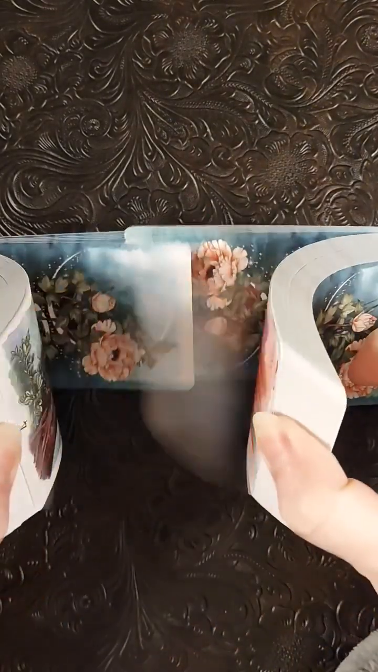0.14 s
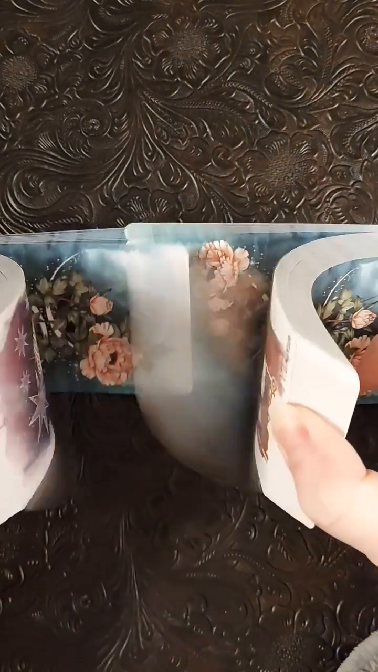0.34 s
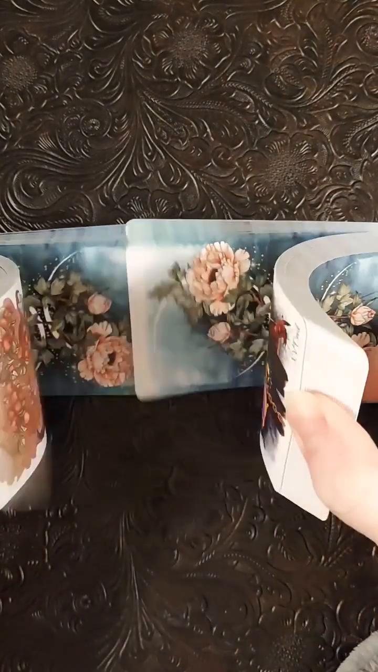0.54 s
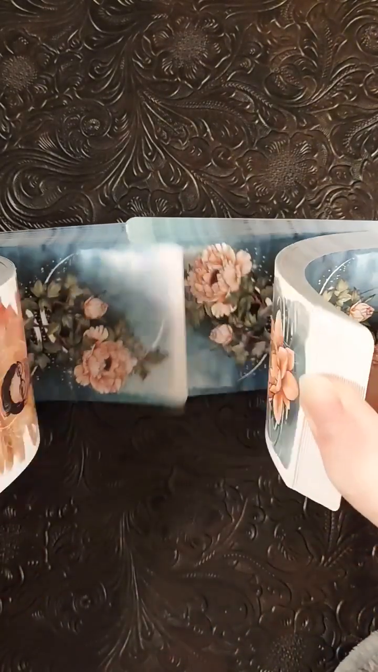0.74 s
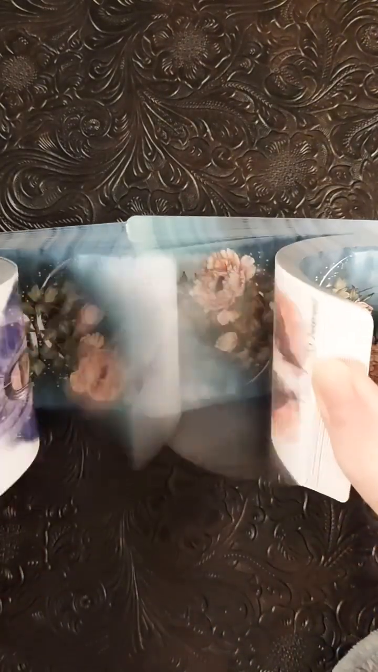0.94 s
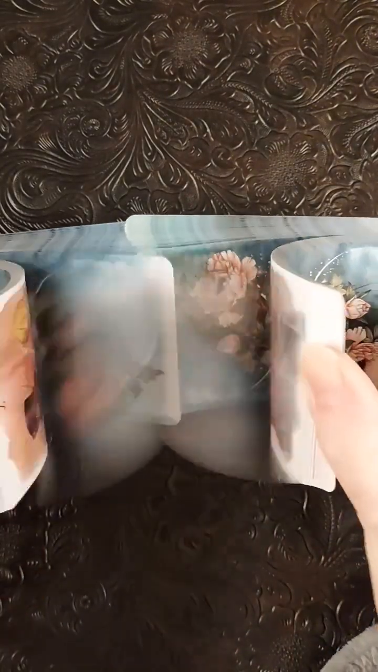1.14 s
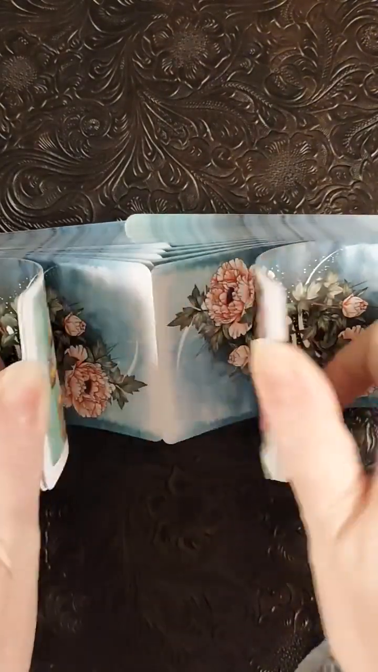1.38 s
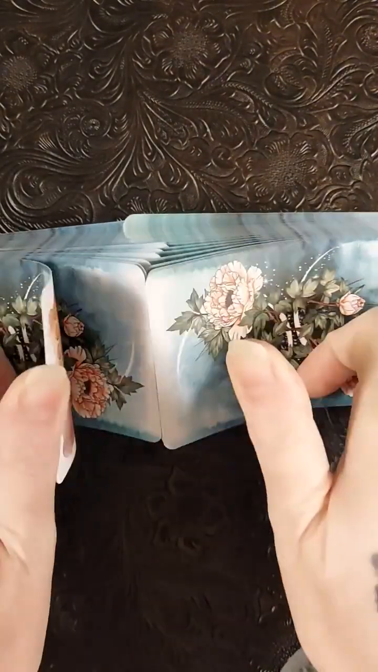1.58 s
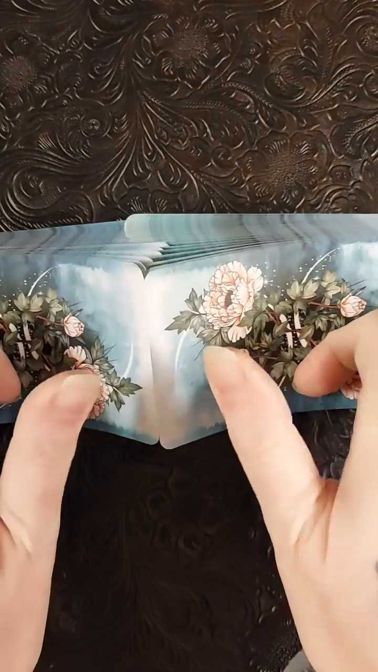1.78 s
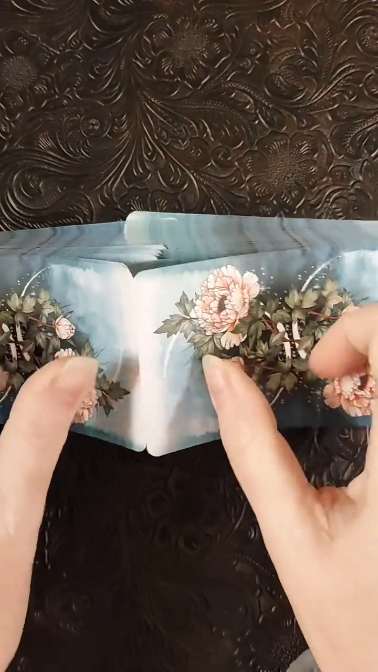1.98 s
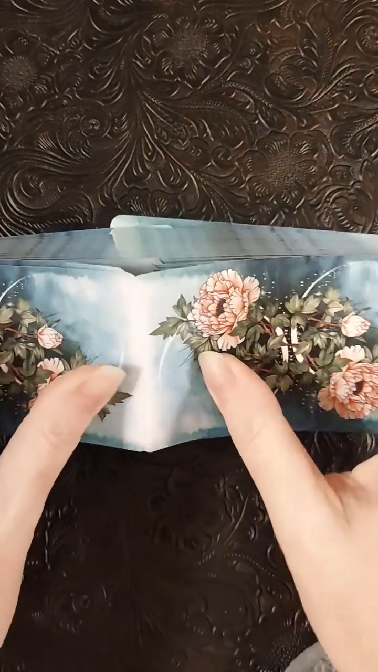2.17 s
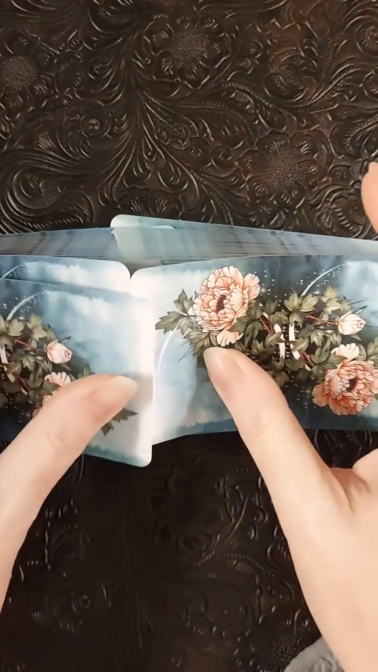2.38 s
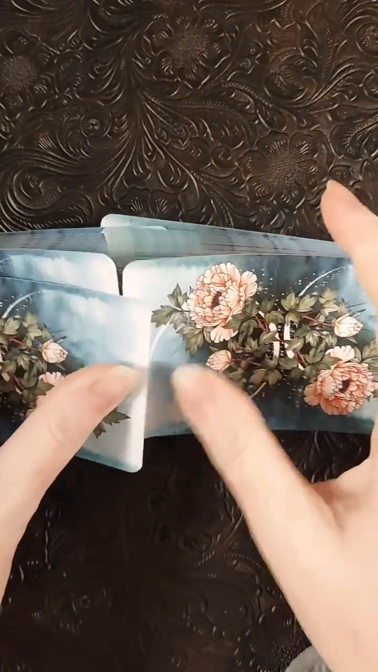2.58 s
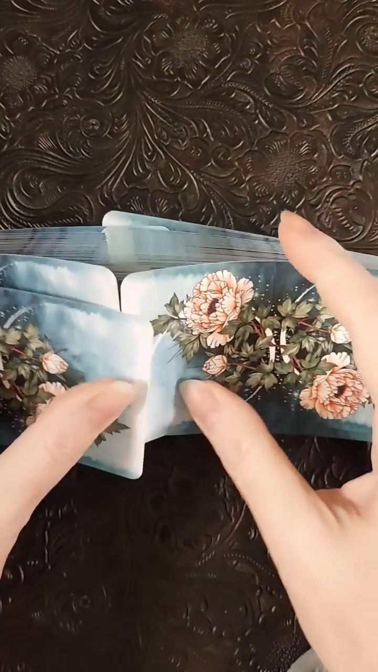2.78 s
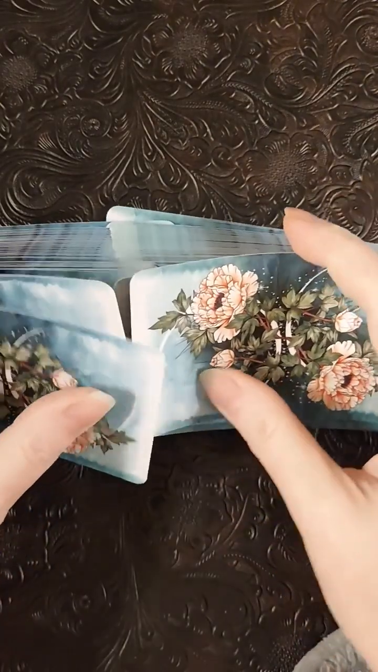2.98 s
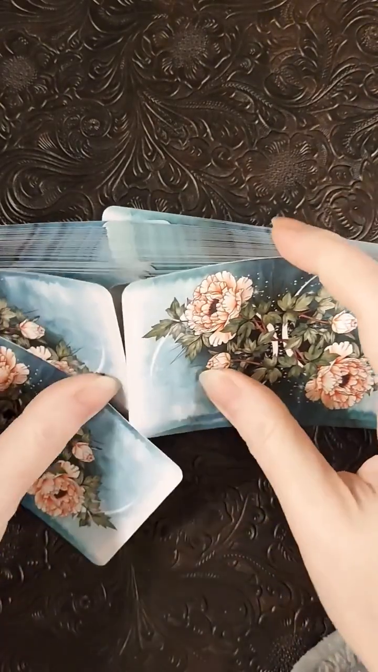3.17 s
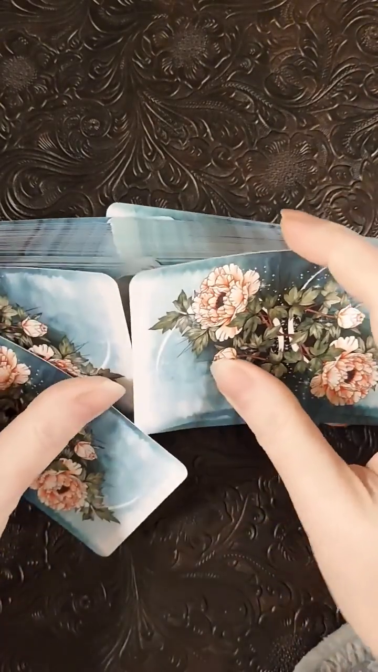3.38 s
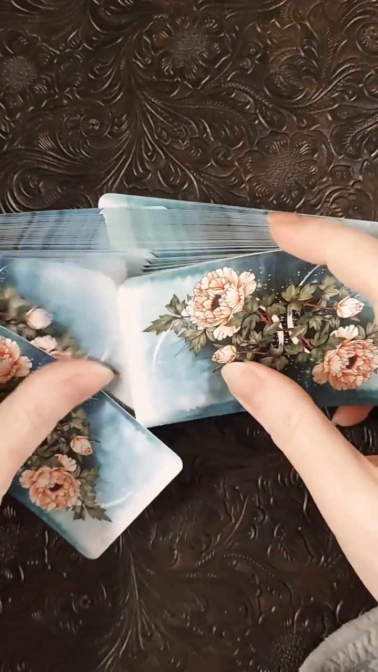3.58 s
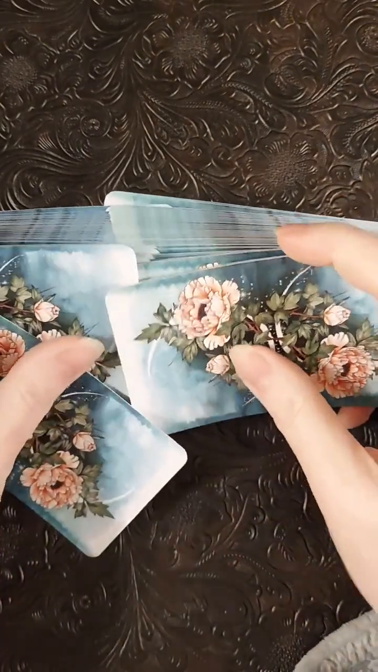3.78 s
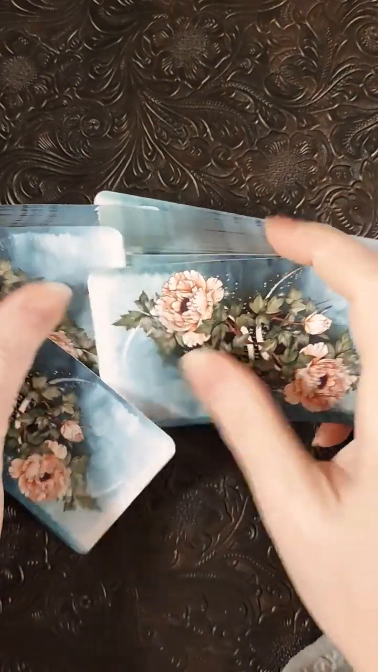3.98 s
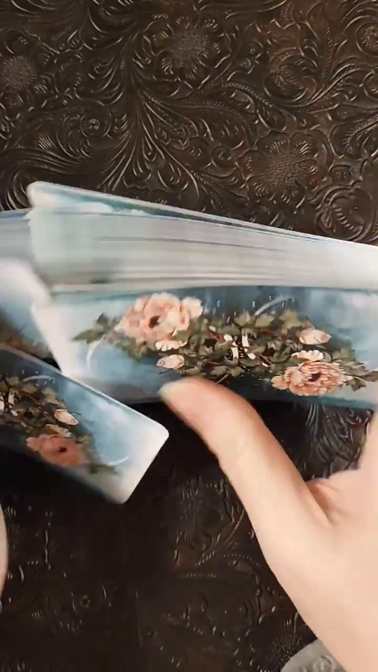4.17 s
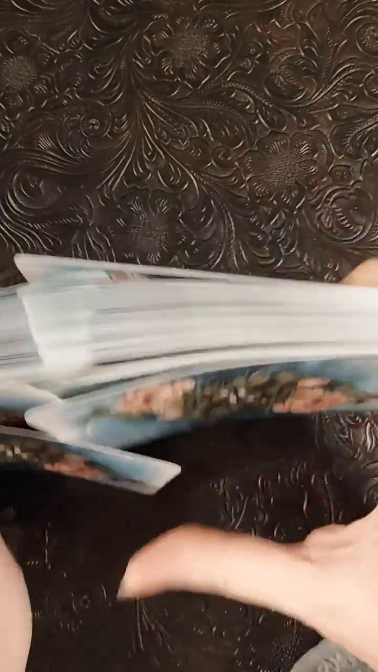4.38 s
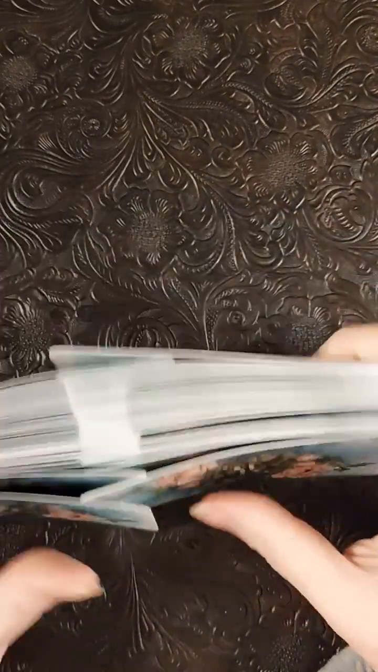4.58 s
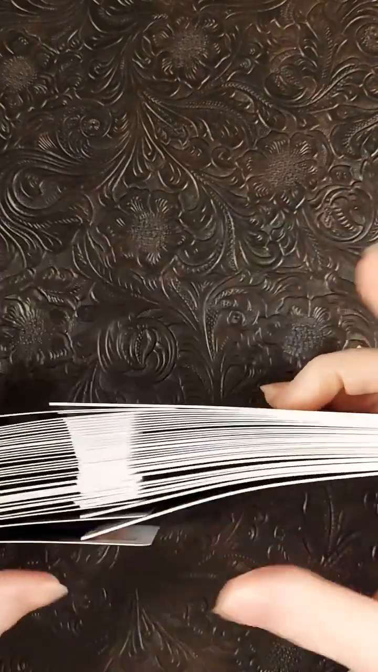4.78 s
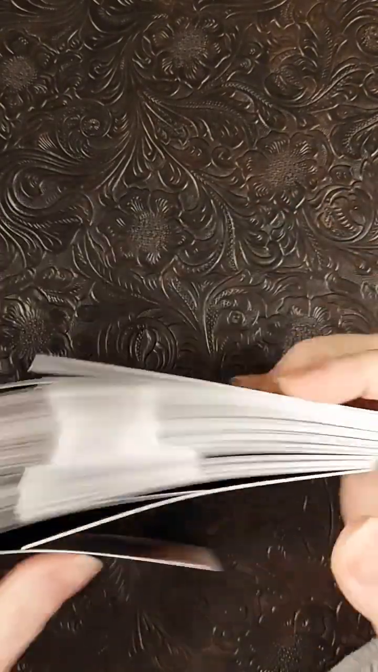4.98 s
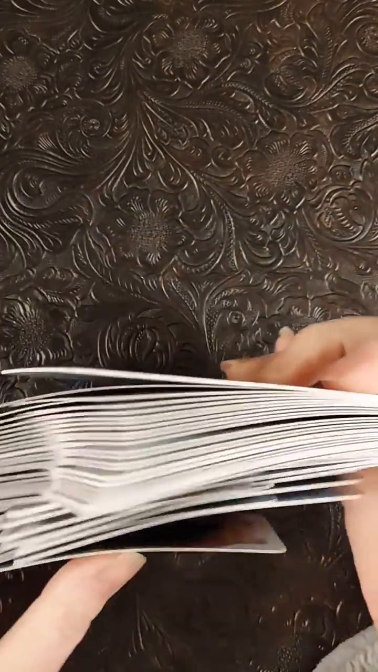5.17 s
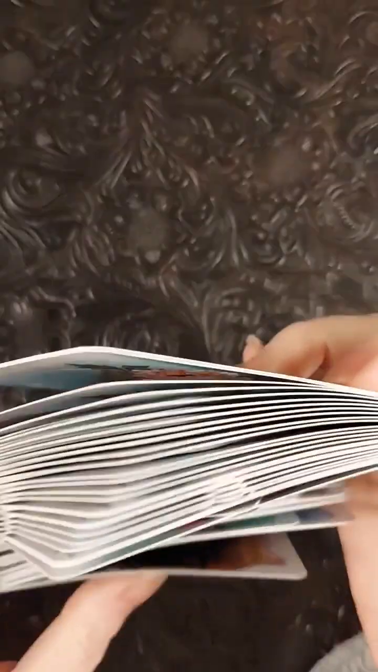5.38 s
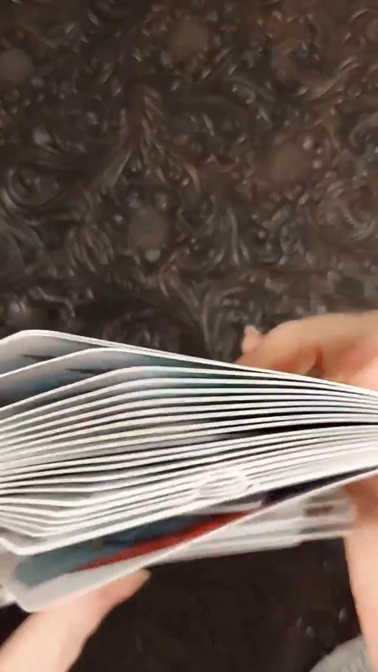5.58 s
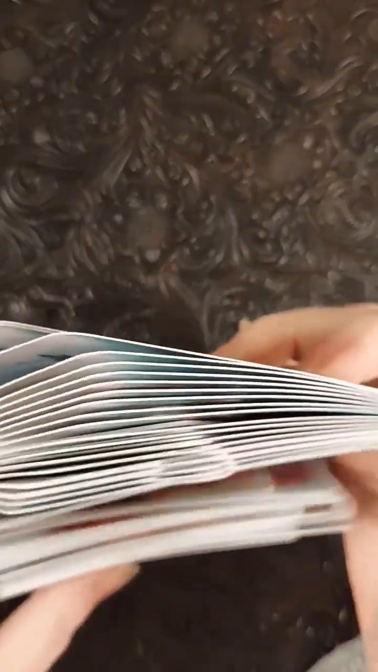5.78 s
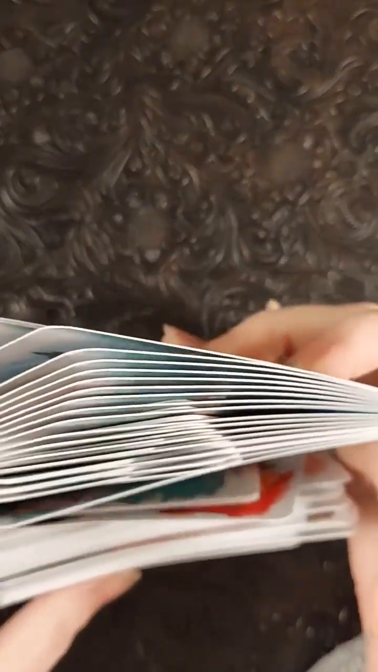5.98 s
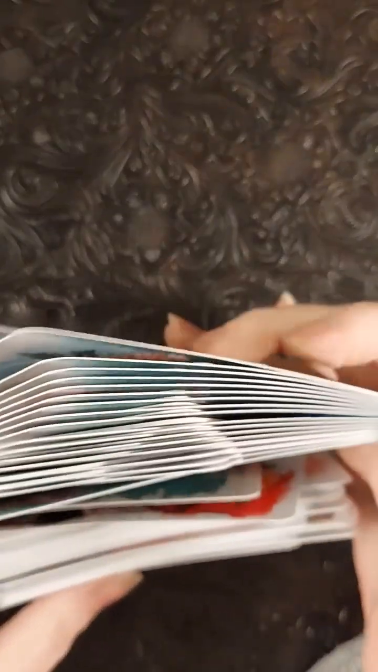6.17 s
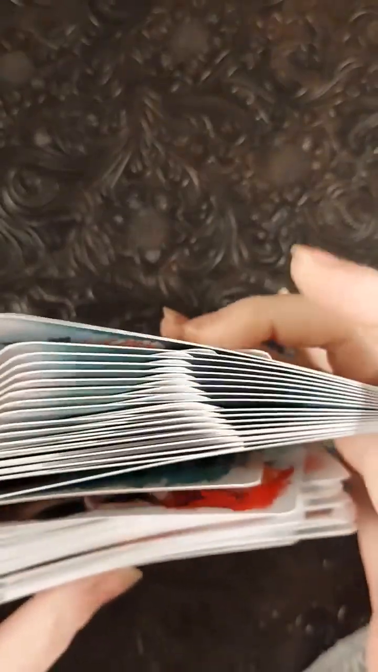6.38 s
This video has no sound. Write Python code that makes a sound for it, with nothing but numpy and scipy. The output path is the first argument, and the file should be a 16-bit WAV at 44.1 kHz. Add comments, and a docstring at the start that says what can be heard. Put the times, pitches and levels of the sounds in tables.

```python
"""Stiff cards snap and slap in a quick riffle at first, over rustling, a low machine hum and faint room noise.
The pack is then nudged, lifted and knocked square on a desk.
Each card blow is spiky noise for the edge, ringing noise for the pile and a soft puff of air.
Sliding faces are bands of grainy noise; knocks push the resonances of the desk.
Pressing hands are low noise, the hum is two sine tones, and a short echo follows the blows."""
import sys
import numpy as np
from scipy import signal
from scipy.fft import rfft, irfft, next_fast_len
from scipy.io import wavfile
from scipy.ndimage import uniform_filter1d, map_coordinates

SR = 44100
rng = np.random.default_rng(int(sys.argv[2]) if len(sys.argv) > 2 else 0)


def transcribe(signal):
    """Save signal, clipped to [-1, 1], as a 16-bit WAV file at the path in sys.argv[1]."""
    frames = np.atleast_2d(signal).T
    limited = np.clip(frames, -1, 1)
    pcm = np.round(limited * 32767).astype(np.int16)
    wavfile.write(sys.argv[1], SR, pcm)


N = 284004

# Blows and thuds get further gains; rubbing, rumble and hum use their table levels; the microphone colours all.

# Cards slapping the pile: (time [s], snap level [dB], pile ring level [dB], snap time to fall 60 dB [s],
# ring centre [Hz], treble tilt [dB], left over right [dB])
SLAPS = [(0.0327, -40.5, -47.5, 0.041, 1730.0, 3, -11), (0.0445, -20.5, -44.5, 0.097, 2045, -8.5, -2),
         (0.076, -37.5, -38, 0.033, 1630, 0.5, -3), (0.0985, -1.5, -38.5, 0.026, 2680.0, -7, 2),
         (0.1156, -24.5, -40.5, 0.041, 2050.0, -2.5, -3), (0.1503, -13.5, -31.5, 0.03, 1680.0, -6.5, -2.5),
         (0.176, -16.5, -40, 0.021, 1873, -1.5, -3.5), (0.2062, -3.5, -34.5, 0.032, 1854, -1.5, -2),
         (0.2485, -17.5, -46, 0.045, 1080.0, -6, 0), (0.271, -18.5, -37, 0.04, 1960, 2.5, 1),
         (0.3248, -23.5, -40.5, 0.052, 2220.0, -8, -1.5), (0.3426, -20.5, -36, 0.041, 2770, -2.5, -2.5),
         (0.3607, -30, -47, 0.033, 1760.0, 2, -6), (0.381, -16.5, -57, 0.088, 1600.0, -2, 1),
         (0.4074, -19.5, -37, 0.05, 1490.0, 7.5, -4.5), (0.4255, -27, -46.5, 0.041, 2720.0, -14.5, 2),
         (0.441, -18, -34.5, 0.061, 1350, -3.5, 0.5), (0.463, -19.5, -38.5, 0.096, 2290.0, 0, -1),
         (0.511, -16.5, -44.5, 0.06, 2420.0, -2, -2.5), (0.5225, -22.5, -41, 0.081, 2110.0, -3, 0),
         (0.561, -21, -60, 0.031, 2530.0, -10, -3), (0.613, -16.5, -42, 0.057, 2150.0, -5, -1),
         (0.6542, -33.5, -45.5, 0.018, 1200, -6, -0.5), (0.663, -13, -25, 0.049, 1875, -2, 1.5),
         (0.7162, -14.5, -24.5, 0.085, 2290.0, 2, 1.5), (0.7338, -16, -33, 0.043, 2470, -1.5, -3.5),
         (0.74, -27, -43, 0.017, 2200, 0, 2.5), (0.755, -30, -42, 0.02, 2600, -0.5, -2),
         (0.7656, -11.5, -19, 0.082, 2227, -1.5, -2.5), (0.8014, -28.5, -41, 0.033, 1315, -4.5, -2.5),
         (0.829, -19, -37.5, 0.032, 1210.0, -0.5, -1), (0.8611, -13, -25, 0.043, 2002, -7.5, -3),
         (0.8935, -10, -32, 0.03, 2034, -13.5, -4.5), (0.909, -30.5, -39, 0.033, 1908, -3.5, -1),
         (0.927, -12.5, -18.5, 0.071, 1986, -5.5, -3.5), (0.9559, -9.5, -17, 0.066, 2800, -4.5, -1.5),
         (0.9709, -17.5, -23.5, 0.13, 2440, 3, -1.5), (0.9886, -15.5, -22.5, 0.059, 1880, -2, -1),
         (1.0003, -13, -29.5, 0.03, 2145, -7.5, 1), (1.029, -34.5, -41.5, 0.03, 1722, -3, -5),
         (1.035, -11, -15.5, 0.087, 2344, 0, 1), (1.047, -26.5, -26, 0.047, 1992, -6, 0.5),
         (1.0767, -29.5, -41, 0.043, 1309, 0, -1), (1.088, -32.5, -44.5, 0.023, 1535, -3.5, -1),
         (1.112, -12.5, -34, 0.031, 1860, -4, -0.5), (1.1429, -12.5, -18, 0.034, 2157, -5, -2),
         (1.1603, -10.5, -20.5, 0.039, 2213, -4, -1.5), (1.183, -31, -36.5, 0.034, 2660.0, -10.5, -3.5),
         (1.1943, -22.5, -31, 0.081, 1823, 3.5, -4.5), (1.205, -18, -28.5, 0.03, 1807, 0.0, 0),
         (1.2393, -5, -20, 0.065, 1816, -3, 1), (1.2466, -20, -31, 0.014, 1938, -5.5, -2),
         (1.2878, -6, -14.5, 0.041, 2384, -14, 2.5), (1.2948, -8.5, -32, 0.063, 2646, 13, 0),
         (1.303, -15.5, -22, 0.095, 3040.0, 0, -4.5), (1.324, -7, -31, 0.046, 1890.0, 2, 0),
         (1.342, -18, -23, 0.036, 1822, -8, 2), (1.368, -6, -30, 0.023, 1663, -3, -2.5),
         (1.4225, -9, -22, 0.024, 2093, -6.5, 0), (1.4267, -14, -26.5, 0.064, 2193, 3, -1.5),
         (1.4476, -12, -31.5, 0.059, 1253, -1.5, 1), (1.4897, -21, -29, 0.055, 1920, -2.5, 1.5),
         (1.5063, -29.5, -41.5, 0.027, 2107, 9.5, 1), (1.5201, -22.5, -29, 0.047, 1723, -0.5, -4),
         (1.5509, -31.5, -51, 0.03, 2176, 2, -3.5), (1.5635, -19, -35, 0.043, 1768, -5, 1),
         (1.5837, -22.5, -28.5, 0.091, 1405, -3.5, 0.5), (1.644, -24, -41.5, 0.034, 1933, -5, -3),
         (1.705, -31, -45, 0.12, 2870.0, 3.5, 0), (1.718, -20.5, -38, 0.023, 2070, -5, 3)]
# Air under a slap as the pile grows: (time [s], level [dB])
PUFF = [(0, -29.5), (.3, -39.5), (1.1, -38.5), (1.35, -30.5), (1.75, -45.5)]
PUFF_GROWS = 0.34  # dB more air per dB of snap
# Ringing of the pile: (centre [Hz], width [Hz], level [dB])
PILE_MODES = [(720, 87, 4), (1147, 54, 2), (1540, 260, -1), (2080, 560, 1), (2360, 550, -3),
              (2970, 120, -0.5)]
# Colour of a snapping edge: (frequency [Hz], level [dB per Hz])
SNAP_COLOUR = [(880, -11), (1500, -11.5), (2140, -8.5), (2930, -12), (3560, -6), (5880, -5.5), (7590, -6),
               (13500, -5), (15700, -14.5)]
# Tone of the air puff from under a card: (centre [Hz], width [Hz], level [dB])
AIR_MODES = [(204, 260, 0)]
# How alike left and right are for card blows: (frequency [Hz], likeness [0 to 1])
CARD_ALIKE = [(200, 0.2), (1000, 1), (2500, 0.36), (4000, 0.46), (6000, .12), (14000, 0.47)]
# How early sound reaches the left channel: (time [s], lead [ms])
LEAD = [(0, .13), (3.7, 0.12), (4.3, 0.0033), (6.4, 0.011)]
FLICK_DB = 13  # one spike as the edge leaves, above the small contacts
DETUNE = 0.053  # pile modes shift by about this share from blow to blow
RING_RISE_S, STRIKE_T60_S = 0.001, 0.004  # the face lands gradually; the first contact is short
# Loss of a mode one octave from the ring's centre
SLAP_FOCUS_DB, TICK_FOCUS_DB, KNOCK_FOCUS_DB = 8.5, 14.5, 30

# Bent cards rustling between slaps: (time [s], hiss level [dB], scrape above hiss [dB])
RUSTLE = [(0, -56, 1.5), (.25, -50.5, -8), (.47, -58.5, -4), (.72, -63, 8), (.85, -51.5, 0.5),
          (1.15, -55, -1), (1.4, -45.5, -1.5), (1.66, -63, 0), (1.78, -71, 2), (1.82, -120, 0)]
# Faces sliding over each other: (time of peak [s], speeding up [s], slowing down [s], hiss level [dB],
# scrape above hiss [dB])
STROKES = [(1.849, 0.028, 0.17, -62, 7.5), (1.949, 0.13, 0.042, -52, -8), (2.12, 0.12, 0.16, -57, -2.5),
           (2.236, 0.097, 0.094, -56.5, 1), (2.54, 0.045, 0.1, -76.5, 10.5), (2.85, 0.079, 0.12, -77.5, 7),
           (3.01, 0.061, 0.11, -64, 7.5), (3.18, 0.27, 0.055, -58, -11), (3.279, 0.17, 0.11, -74.5, 11),
           (3.55, 0.061, 0.096, -73.5, 6.5), (3.7, 0.12, 0.13, -65, 4), (3.991, 0.24, 0.35, -67, -2),
           (4.315, 0.055, 0.08, -68.5, 3.5), (4.521, 0.15, 0.16, -50, -10.5), (4.621, 0.17, 0.11, -54.5, 5),
           (4.75, 0.17, 0.14, -65, -1.5), (5.051, 0.14, 0.14, -42, -11.5), (5.27, 0.33, 0.81, -52, -5.5),
           (5.419, 0.13, 0.028, -49, 4), (5.5, 0.15, 0.11, -96, -3), (5.598, 0.041, 0.1, -51, -15.5),
           (5.762, 0.15, 0.088, -44.5, -15), (5.848, 0.059, 0.054, -49, 1.5),
           (5.93, 0.052, 0.057, -47, -14), (6.038, 0.14, 0.04, -48.5, -14), (6.18, 0.14, 0.18, -73.5, -3.5),
           (6.41, 0.056, .1, -65.5, -4.5)]
EDGE_DB, SWELL = 32, 1.95  # fall from the peak to either end of a stroke; roundness of its top
# Colour of the hiss: (frequency [Hz], level [dB per Hz])
HISS_COLOUR = [(1760, -33), (3000, -3), (5290, 3.5), (5830, 2), (8600, 0.5), (9740, 1), (14600, -3),
               (15700, -1)]
# Colour of the scrape: (frequency [Hz], level [dB per Hz])
SCRAPE_COLOUR = [(350, -51.5), (600, -19), (792, -17.5), (1170, -8), (1400, -0.5), (1850, 4), (2900, -0.5),
                 (4000, -11), (5200, -42.5), (8800, -120)]
# How alike left and right are for rubbing: (frequency [Hz], likeness [0 to 1])
RUB_ALIKE = [(500, 0.27), (2500, .6), (5000, 0.16), (9000, 0.52), (14000, .15)]
# Change in the top of the hiss: (time [s], gain [dB])
SHEEN = [(0, 4.5), (1.7, -6.5), (2.3, -4), (3.2, 0.5), (4, -3), (4.5, -4.5), (4.9, 1), (5.1, 2.5),
         (5.3, -6.5), (5.6, 1), (5.76, 2), (5.93, 6), (6.04, 7.5), (6.44, -11)]
SHEEN_HZ = 8600  # the top of the hiss starts around here
# Change in the low band of the scrape: (time [s], gain [dB])
DRAG = [(0, 9.5), (1.8, -8.5), (2.1, -4), (3.2, -0.5), (3.5, 10), (3.9, 14), (4.35, 14), (4.5, 1.5),
        (5.1, -6), (5.8, 6), (6.44, 5.5)]
DRAG_HZ, DRAG_WIDTH_HZ = 1270, 780

# Hands pressing on the desk: (time [s], rumble level [dB])
HANDS = [(0, -49.5), (.4, -53), (1.2, -44), (1.55, -65.5), (1.75, -73.5), (4.1, -62), (4.4, -64), (6, -62),
         (6.44, -68.5)]
# Colour of the hand rumble: (frequency [Hz], level [dB per Hz])
RUMBLE_COLOUR = [(30, -4), (70, -4.5), (130, 0.5), (300, -6), (600, -18.5), (1200, -43.5)]
# Machine hum: (time [s], level [dB])
HUM = [(0, -55.5), (1.6, -55.5), (2.9, -51), (3.7, -49), (4.2, -54.5), (4.9, -52.5), (5.7, -56.5), (6, -75),
       (6.44, -69)]
HUM_HZ = 88.8
# Colour of the room noise: (frequency [Hz], level [dB per Hz])
ROOM_COLOUR = [(12, -53.5), (20, -14), (67, -0.5), (93, -14.5), (113, -5), (138, -14.5), (311, -23.5),
               (400, -39), (1530, -36.5), (1860, -33), (3650, -44.5), (14000, -54), (16100, -58.5)]
ROOM_DB = -60
# How alike left and right are for room noise and rumble: (frequency [Hz], likeness [0 to 1])
ROOM_ALIKE = [(60, 1), (300, 0.56), (1000, 0.33), (3000, 0.05)]
# How fast the echo dies: (frequency [Hz], time to fall 60 dB [s])
WALLS = [(200, 0.41), (2000, 0.043), (12000, 0.076)]

# Card edges catching while the pack is squared: (time [s], snap level [dB], pile ring level [dB],
# ring centre [Hz], left over right [dB])
TICKS = [(2.1298, -43, -46.5, 910.0, -2), (2.142, -53, -49, 2890.0, -5), (2.154, -42, -49, 2760.0, -3),
         (2.175, -44, -49, 1970.0, 0.0), (2.194, -37, -54, 2190.0, 1), (2.205, -34.5, -42, 2760.0, -2),
         (2.215, -45.5, -55, 2560.0, 0), (2.2266, -42, -53, 2160, -4), (2.236, -26.5, -37.5, 2660, 9),
         (2.244, -35, -42, 1870.0, -9), (2.253, -51.5, -44, 1440, -0.5), (2.2781, -43.5, -51, 1700, 1),
         (2.528, -52, -48.5, 2560.0, -0.5), (2.803, -40, -39.5, 1390, -2), (2.9897, -25.5, -26, 1470, 0),
         (3.0387, -54, -63, 1710.0, -2), (3.2036, -40, -48, 2350, 0), (3.226, -34, -42, 1720, 0),
         (3.256, -39, -31.5, 1450, -1.5), (3.278, -33.5, -40.5, 1320, 0), (3.489, -57.5, -54.5, 2195, -0.5),
         (3.5482, -48, -49, 1630, -2.5), (3.6507, -31.5, -37, 1330.0, -2.5),
         (3.6706, -18, -23.5, 1460, -1.5), (3.678, -28, -35, 1640.0, 3), (3.699, -56, -47.5, 1494, -3),
         (4.2932, -57, -53, 1454, -3), (4.3151, -41.5, -52, 1990, -5), (4.426, -43.5, -46, 2370, -4),
         (4.59, -32, -30.5, 2220, -6), (4.634, -48, -58, 2500, 0), (4.661, -32, -37, 2700, -1),
         (4.7613, -40, -77, 2640, -2.5), (5.225, -57, -49, 2560, -6), (5.8929, -34.5, -34, 2390, -0.5),
         (5.905, -40, -35.5, 2380, 7), (5.9125, -43, -51, 2600, 2), (5.931, -43, -48, 2500, -4)]
TICK_T60_S = 0.04  # snap decay
TICK_BRIGHT_DB, TICK_PUFF_DB = -8, -5  # treble tilt; air relative to the ring
# Ringing of cards lying flat under the hands: (centre [Hz], width [Hz], level [dB])
SPREAD_MODES = [(822, 126, 3), (1340, 240, -11), (1963, 150, 3), (2620, 260, -8.5), (2970, 115, 0)]
# The pack's edge meeting the desk: (time [s], snap level [dB], pile ring level [dB], thud level [dB],
# contact length before limits [ms], ring centre [Hz])
KNOCKS = [(4.558, -31.5, -34.5, -32.5, 7.3, 1960), (4.603, -34, -29.5, -29.5, 4.6, 2160),
          (4.6144, -30.5, -39, -27, 4.5, 2350.0), (4.6463, -39.5, -28, -28.5, 5.1, 2150.0),
          (4.6505, -28.5, -30.5, -17.5, 7, 2400), (4.663, -53.0, -39.5, -31.5, 4.1, 990.0),
          (5.3655, -33, -34, -33.5, 3.9, 2450), (5.3726, -33, -34, -27, 4.3, 2740.0),
          (5.386, -61, -26.5, -29, 2, 905), (5.3912, -60.0, -38, -24.5, 4.1, 990),
          (5.4024, -38, -38, -29.5, 2.7, 1380.0), (5.4124, -33, -32, -32, 3.4, 2213),
          (5.4195, -34.5, -30, -35, 7.6, 2350), (5.437, -41, -42, -40.5, 4.4, 2440),
          (5.6426, -41.5, -38, -36.5, 4.6, 2100), (5.685, -36.5, -47, -43.5, 3.5, 1970.0),
          (5.6997, -34.5, -44, -48, 1.3, 2110.0), (5.792, -38, -39, -39.5, 4.9, 2290.0),
          (5.8259, -37.5, -28, -26, 5.2, 2280), (5.8388, -48, -24.5, -23, 4.35, 1270),
          (5.844, -60.0, -26, -32, 5.1, 1100), (5.885, -46.5, -32, -38.5, 7.1, 2430),
          (5.9157, -42.5, -40.5, -42.5, 4.8, 2320.0), (5.9705, -32.5, -39.5, -35, 6.9, 2500)]
KNOCK_T60_S = 0.065  # snap decay of the whole pack
KNOCK_BRIGHT_DB, KNOCK_PUFF_DB = -14, -2  # treble tilt; air relative to the thud
CARD_PAN_DB, PAN_SPREAD_DB = -1.6, 7  # left over right for a knock, and its scatter
BRIGHT_SPREAD_DB = 1.5  # scatter of the treble tilt of ticks and knocks
THUD_LAG_S = 0.00207  # the weight follows the edge
# Ringing of the desk: (centre [Hz], width [Hz], level [dB])
DESK_MODES = [(98, 8.2, 17.5), (167.2, 150, 18.5), (265, 22, 10.5), (352, 90, -20), (510, 190, -15.5),
              (845, 18, 0)]
# The whole desk giving under a knock: (centre [Hz], width [Hz], level [dB])
SWAY_MODES = [(59, 42, 2.5)]

# Colour the microphone close over the desk gives to everything: (frequency [Hz], gain [dB])
MIC = [(20, -16), (40, -4), (600, -0.5), (830, 1.5), (1300, -2.5), (1900, -1.5), (2550, -0.5), (2900, 1.5),
       (3350, -2), (4100, 0.5), (4500, -1), (4900, -1.2), (5400, -2.5), (6000, 0.5), (6300, 0),
       (6650, -0.5), (7400, -2), (15700, -0.04), (16000, -10.5), (16200, -26), (16800, -33.5)]
TOP_HZ = 16812  # nothing passes from here up


def amp(db):
    """Turn dB into a gain."""
    return 10 ** (np.asarray(db) / 20)


def unit(x):
    """Scale a signal to an rms of 1."""
    return x / np.sqrt(np.mean(x ** 2) + 1e-20)


def along(points, hz):
    """Read a curve of (frequency, value) points on a log frequency axis."""
    f, v = np.transpose(points)
    return np.interp(np.log(hz + 1), np.log(f + 1), v)


def curves(rows):
    """Give one value per sample for each column after the time."""
    s, *columns = np.transpose(rows)
    return [np.interp(np.arange(N) / SR, s, column) for column in columns]


def wobble(rate):
    """Draw a smooth random curve with this many random points a second."""
    points = rng.standard_normal(int(N * rate / SR) + 4)
    return map_coordinates(points, [np.arange(N) * rate / SR])


def filtered(x, response):
    """Filter a signal by a complex function of frequency."""
    n = x.shape[-1]
    m = next_fast_len(n + 8192)  # spare room for ringing
    return irfft(rfft(x, m) * response(np.fft.rfftfreq(m, 1 / SR)), m)[..., :n]


def modes(table):
    """Add up resonances of alternating sign, each ringing on after a push."""
    def response(f):
        return sum((-1) ** k * amp(db) * 1j * f * width / (centre * centre - f * f + 1j * f * width)
                   for k, (centre, width, db) in enumerate(table))
    return response


def flat_gain(response):
    """Scale a response so that white noise keeps its power."""
    scale = np.sqrt(np.mean(np.abs(response(np.linspace(0, SR / 2, 4096))) ** 2))
    return lambda f: response(f) / scale


def carrying(x, envelope):
    """Scale each row to the energy of the envelope."""
    return x * np.linalg.norm(envelope) / np.linalg.norm(x, axis=1, keepdims=True)


def pair(two, alike, lead_ms=0):
    """Mix two unrelated signals to left and right of a given likeness, the left one early."""
    def shares(hz):
        turn = np.arccos(np.clip(along(alike, hz), -1, 1)) / 2
        return np.array([np.cos(turn), np.sin(turn)])

    def delay(hz):
        return np.exp(-2j * np.pi * hz * np.array([[0], [lead_ms / 1000]]))

    mid, side = filtered(two, shares)
    return filtered(np.array([mid + side, mid - side]), delay)


def rush(colour, alike, patchy_db):
    """Make coloured stereo noise of rms 1 whose time and frequency patches vary in level."""
    z = signal.stft(rng.standard_normal((2, N)), nperseg=512)[2]
    field = uniform_filter1d(rng.standard_normal(z.shape[1:]), size=6, axis=0)  # smooth over frequency
    field = uniform_filter1d(field, size=8, axis=1)  # smooth over time
    two = signal.istft(z * amp(patchy_db * unit(field)), nperseg=512)[1][:, :N]
    return unit(filtered(pair(two, alike), lambda hz: amp(along(colour, hz))))


def card_blows(events, body, snap_db, ring_db, puff_db, ring_t60, rasp_db, hard_db, focus_db, strike_db):
    """A card edge rasps in, cracks, and leaves spiky noise; the landing rings the pile and pushes out air."""
    early, size = 400, 2800  # samples before the crack, and in all
    out = np.zeros((2, N + size))
    t = (np.arange(size) - early) / SR
    before, after = np.minimum(t, 0), np.maximum(t, 0)
    knots_hz = np.geomspace(1500, 16000, 26)
    mode_hz, width, mode_db = np.transpose(body)
    air = flat_gain(modes(AIR_MODES))
    for s, db, body_db, low_db, t60, bright_db, pan_db, ring_hz in events:
        noise = rng.standard_normal((3, 2, size))

        spiky = noise[0] * amp(1.3 * noise[1, 0])  # many small edge contacts of uneven size
        spiky[0, early] = amp(FLICK_DB) * np.sign(noise[0, 0, early])
        crack = amp(0.34 * (db - hard_db) - 60 * after / 0.0054)  # harder blows crack more
        tail = amp(-1.5 - 60 * after / np.clip(t60, 0.006, 0.2))
        edge = np.where(t < 0, amp(rasp_db + 60 * before / 0.012), crack + tail)

        settle = (1 - np.exp(-after / RING_RISE_S)) * amp(-60 * after / ring_t60)
        landing = settle + (t >= 0) * amp(strike_db - 60 * after / STRIKE_T60_S)
        blow = noise[2] * amp(2.5 * noise[1, 1]) * landing

        # Each blow draws a random colour, and random pitches and strengths of its modes.
        ripple = np.c_[knots_hz, rng.normal(0, 5, 26)]
        tilt = [(5000, 0.018), (11000, bright_db)]
        shift, luck = rng.standard_normal((2, len(body)))
        struck_db = mode_db + 2.5 * luck - focus_db * np.log2(mode_hz / ring_hz) ** 2
        struck = np.c_[mode_hz * (1 + DETUNE * shift), width, struck_db]

        def snap_gain(hz):
            return amp(along(SNAP_COLOUR, hz) + along(ripple, hz) + along(tilt, hz))

        def puff_gain(hz):
            soft = hz / (hz + 90) / (1 + 1j * hz / 900)  # little deep bass or treble in a puff
            return amp(low_db + puff_db) * air(hz) * soft

        snap = amp(db + snap_db) * carrying(filtered(spiky * edge, snap_gain), edge)
        ring = amp(body_db + ring_db) * carrying(filtered(blow, modes(struck)), landing)
        sound = snap + ring + filtered(blow, puff_gain)
        lead_ms = np.interp(s, *np.transpose(LEAD))
        panned = amp([[pan_db / 2], [-pan_db / 2]]) * pair(sound, CARD_ALIKE, lead_ms)
        out[:, round(s * SR) - early:][:, :size] += panned
    return out[:, :N]


def riffle():
    """Cards fall off the thumbs and slap the pile; harder slaps push out more air."""
    s, snap, ring, t60, ring_hz, bright, pan = np.transpose(SLAPS)
    puff = np.interp(s, *np.transpose(PUFF)) + PUFF_GROWS * snap
    rows = np.c_[s, snap, ring, puff, t60, bright, pan, ring_hz]
    return card_blows(rows, PILE_MODES, snap_db=-9, ring_db=3.5, puff_db=5.5, ring_t60=0.034,
                      rasp_db=-2, hard_db=-5, focus_db=SLAP_FOCUS_DB, strike_db=2.5)


def rubbing():
    """Gains of hiss and scrape: the rustle of the riffle, then strokes that speed up and slow down."""
    t = np.arange(N) / SR
    hiss_db, scrape_db = curves(RUSTLE)
    power = amp([hiss_db, hiss_db + scrape_db]) ** 2
    for s, rise, fall, db, above_db in STROKES:
        near = slice(round(max(s - 1, 0) * SR), round((s + 1) * SR))
        away = np.where(t[near] < s, (s - t[near]) / rise, (t[near] - s) / fall)
        power[:, near] += (amp([[db], [db + above_db]]) * amp(-EDGE_DB * away ** SWELL)) ** 2
    return np.sqrt(power)


def slide():
    """Coated faces hiss; edges and fingers scrape lower, both in uneven grains."""
    hiss_gain, scrape_gain = rubbing()
    # Springing cards rustle in bursts; the bursts are weaker after the riffle.
    flutter = np.interp(np.arange(N) / SR, [1.6, 1.8], [6.5, 1.1])
    grain_db = flutter * (wobble(45) + 0.4 * wobble(250)) + 1.5 * wobble(900) + 3 * wobble(9000)
    grit_db = 1.4 * wobble(160)  # edges catch and let go

    hiss = rush(HISS_COLOUR, RUB_ALIKE, patchy_db=2.4)
    top = filtered(hiss, lambda hz: 1 / (1 + (SHEEN_HZ / (hz + 1)) ** 8))
    hiss = hiss + (amp(curves(SHEEN)[0]) - 1) * top

    scrape = rush(SCRAPE_COLOUR, RUB_ALIKE, patchy_db=3)
    low = filtered(scrape, lambda hz: np.exp(-(2 * (hz - DRAG_HZ) / DRAG_WIDTH_HZ) ** 2))
    scrape = scrape + (amp(curves(DRAG)[0]) - 1) * low

    left, right = amp(grain_db) * (hiss_gain * hiss + scrape_gain * amp(grit_db) * scrape)
    # The right channel lags until the pack is lifted: blend from a late copy to the prompt one.
    most_ms = LEAD[0][1]
    late = filtered(right, lambda hz: np.exp(-2j * np.pi * hz * most_ms / 1000))
    turn = np.pi / 2 * np.clip(curves(LEAD)[0] / most_ms, 0, 1)
    return np.array([left, np.sin(turn) * late + np.cos(turn) * right])


def hands():
    """Pressing hands send lumpy low noise through the desk."""
    db, = curves(HANDS)
    return amp(db + 1.2 * wobble(33)) * rush(RUMBLE_COLOUR, ROOM_ALIKE, patchy_db=3.5)


def hum():
    """A machine hums on a low tone of wavering pitch and level, with a weak octave above."""
    db, = curves(HUM)
    turn = 2 * np.pi * np.cumsum(HUM_HZ + 0.5 * wobble(6)) / SR
    waver = amp(1.2 * wobble(10))
    octave = amp(-20 + 1.8 * wobble(3.9)) * np.sin(2 * turn)
    return np.sqrt(2) * amp(db) * waver * (np.sin(turn) + octave)


def room_noise():
    """Faint coloured noise drifts slowly in level."""
    return amp(ROOM_DB + wobble(3.5)) * rush(ROOM_COLOUR, ROOM_ALIKE, patchy_db=3.5)


def walls(x):
    """The room answers with a short noise tail in which each frequency dies at its own speed."""
    hz, t, z = signal.stft(rng.standard_normal((2, SR // 3)), SR, nperseg=256)
    fade = amp(-60 * t / along(WALLS, hz)[:, None])
    tail = signal.istft(z * fade, SR, nperseg=256)[1]
    tail = tail / np.linalg.norm(tail[0])
    delayed = np.pad(x, ((0, 0), (300, 0)))  # the echo starts 300 samples late
    return signal.fftconvolve(delayed, tail, axes=1)[:, :N]


def scattered(s, snap, ring, puff, t60, bright_db, ring_hz, pan_db):
    """Build full rows of card blows in which every edge gets its own brightness."""
    bright = bright_db + BRIGHT_SPREAD_DB * rng.standard_normal(len(s))
    return np.c_[s, snap, ring, puff, t60 + 0 * s, bright, pan_db, ring_hz + 0 * s]


def squaring():
    """Edges catch each other or strike the desk with duller snaps."""
    s, snap, ring, ring_hz, pan = np.transpose(TICKS)
    ticks = scattered(s, snap, ring, ring + TICK_PUFF_DB, TICK_T60_S, TICK_BRIGHT_DB, ring_hz, pan)
    s, snap, ring, thud, _, ring_hz = np.transpose(KNOCKS)
    pan = rng.normal(CARD_PAN_DB, PAN_SPREAD_DB, len(s))
    knocks = scattered(s, snap, ring, thud + KNOCK_PUFF_DB, KNOCK_T60_S, KNOCK_BRIGHT_DB, ring_hz, pan)
    catching = card_blows(ticks, SPREAD_MODES, snap_db=-11.5, ring_db=-4, puff_db=-6.5, ring_t60=0.038,
                          rasp_db=-3, hard_db=-7.5, focus_db=TICK_FOCUS_DB, strike_db=5.5)
    striking = card_blows(knocks, PILE_MODES, snap_db=-12, ring_db=-7, puff_db=-6, ring_t60=0.044,
                          rasp_db=3.5, hard_db=-9, focus_db=KNOCK_FOCUS_DB, strike_db=9.5)
    return catching + striking


def thuds():
    """A soft contact of one cycle pushes the desk top; its hard first touch reaches the higher modes."""
    push, touch = np.zeros((2, N))
    for edge_s, _, _, db, ms, _ in KNOCKS:
        start = round((edge_s + THUD_LAG_S) * SR)
        u = np.linspace(0, 1, round(np.clip(ms, 1.5, 12) * SR / 1000))
        push[start:][:len(u)] += amp(db) * np.sin(2 * np.pi * u) * np.sin(np.pi * u)
        touch[start:][:24] += amp(db) * np.hanning(24)
    desk = amp(-7) * filtered(push, modes(DESK_MODES))
    high = amp(13.5) * filtered(touch, modes(DESK_MODES[-2:]))
    sway = filtered(touch, modes(SWAY_MODES))
    return amp(7.5) * push + desk + high + sway


def scene():
    """Card blows and thuds with a short echo, over rubbing, rumble, hum and room noise."""
    near = riffle() + squaring() + thuds()
    echo = amp(-22) * walls(near)
    return near + echo + slide() + hands() + hum() + room_noise()


def record(dry):
    """The loudest cracks round off near full scale; the microphone then colours and limits the band."""
    rounded = dry / (1 + np.abs(dry / 0.9) ** 6) ** (1 / 6)
    return filtered(rounded, lambda hz: amp(along(MIC, hz)) * (hz < TOP_HZ))


dry = scene()
out = record(dry)
transcribe(out)
```